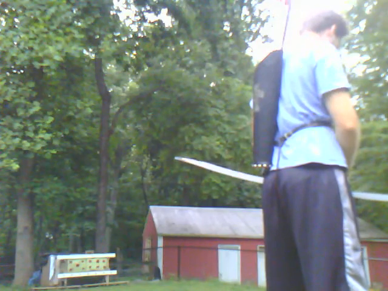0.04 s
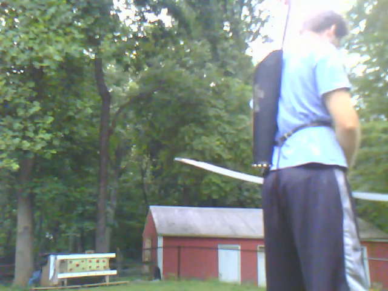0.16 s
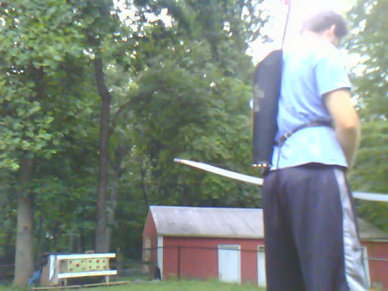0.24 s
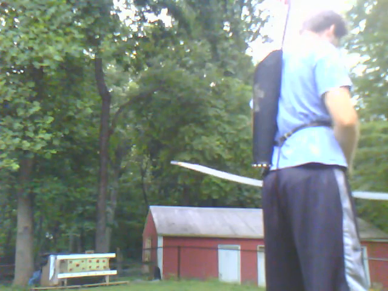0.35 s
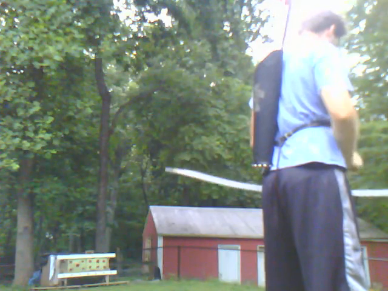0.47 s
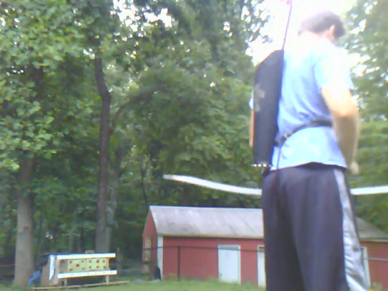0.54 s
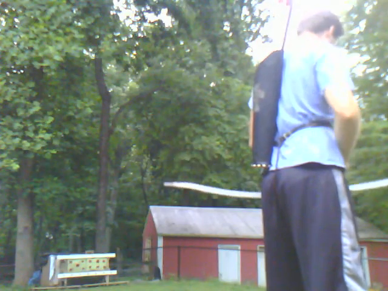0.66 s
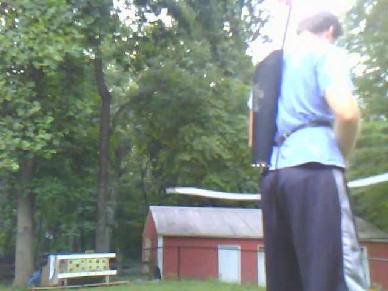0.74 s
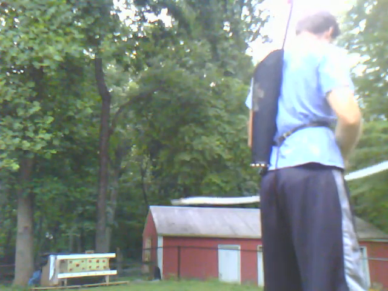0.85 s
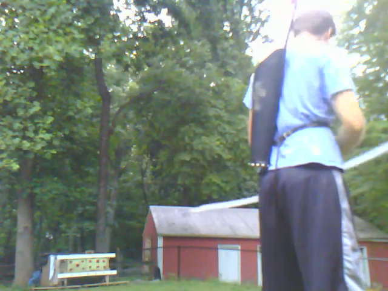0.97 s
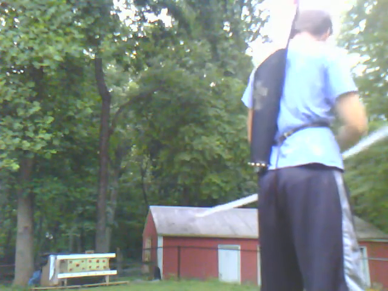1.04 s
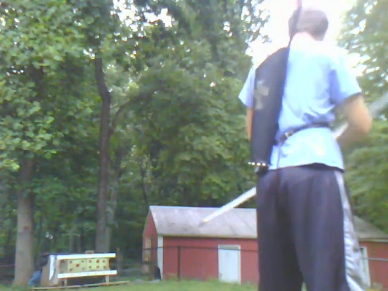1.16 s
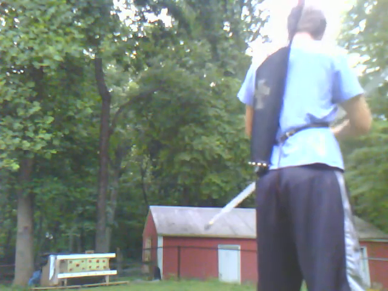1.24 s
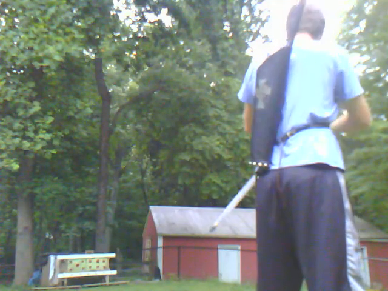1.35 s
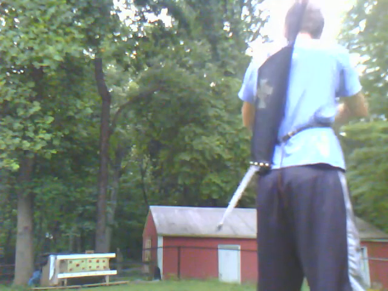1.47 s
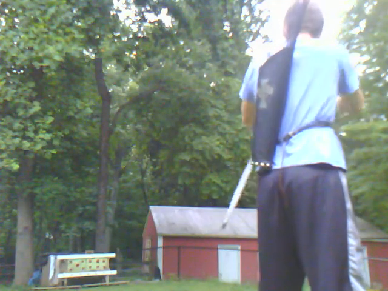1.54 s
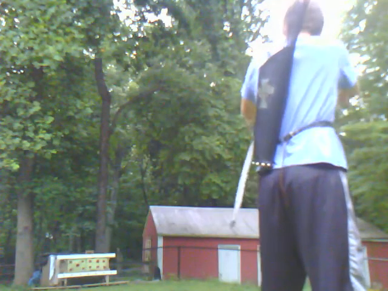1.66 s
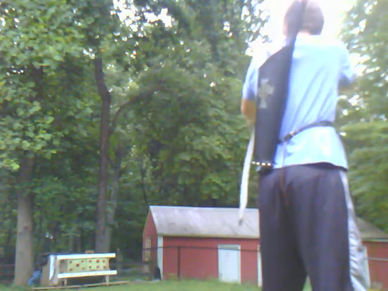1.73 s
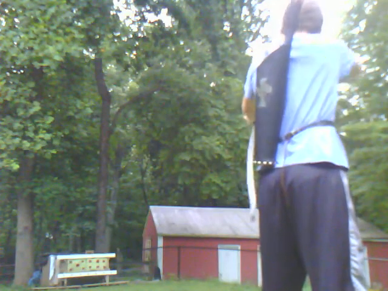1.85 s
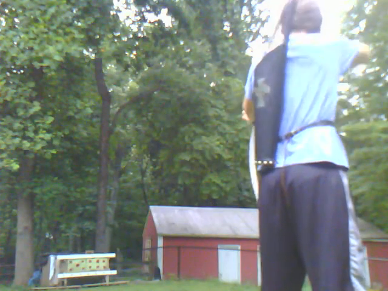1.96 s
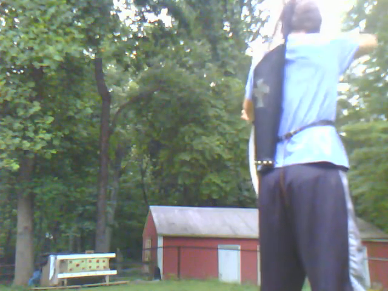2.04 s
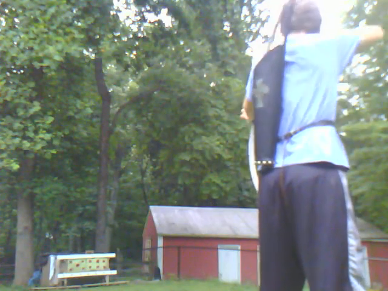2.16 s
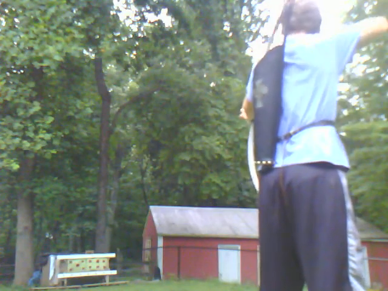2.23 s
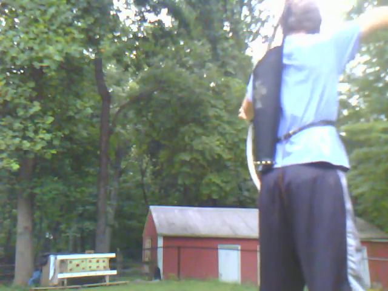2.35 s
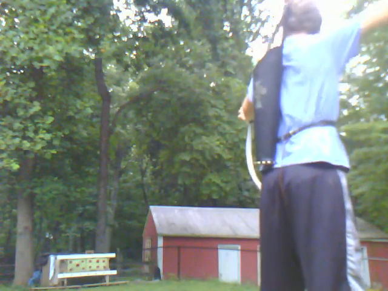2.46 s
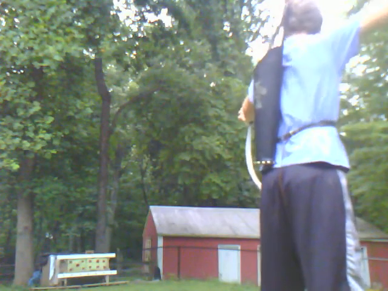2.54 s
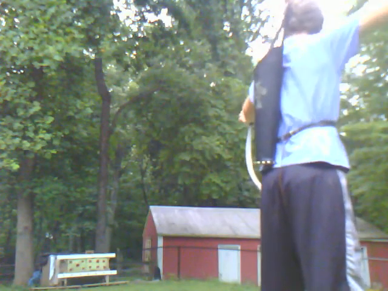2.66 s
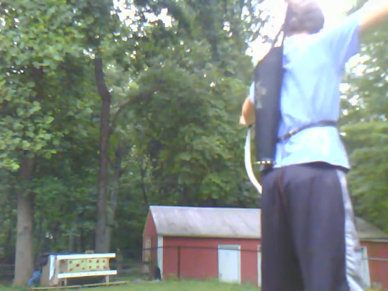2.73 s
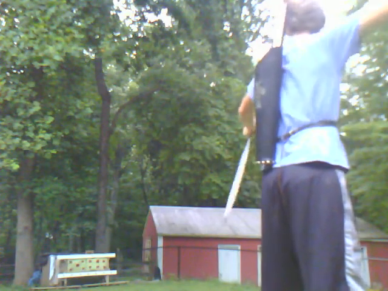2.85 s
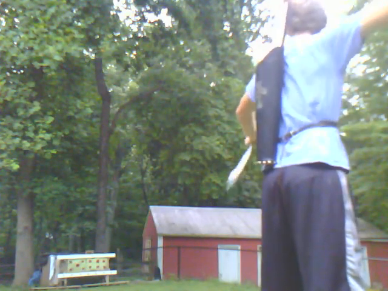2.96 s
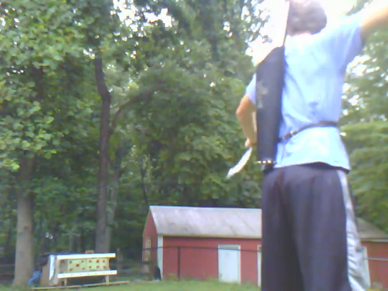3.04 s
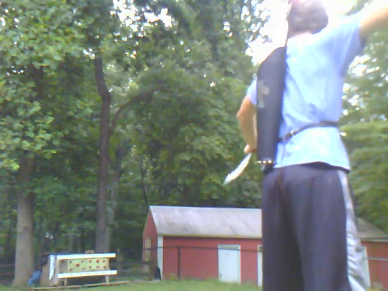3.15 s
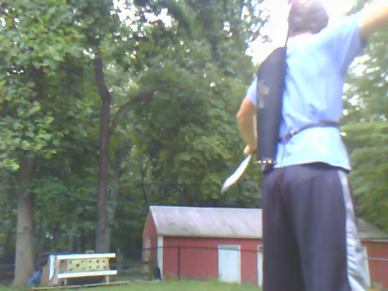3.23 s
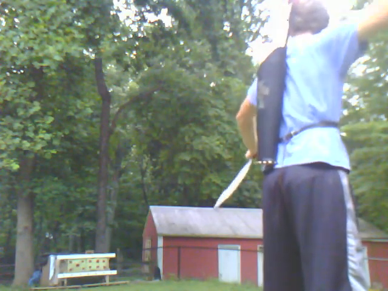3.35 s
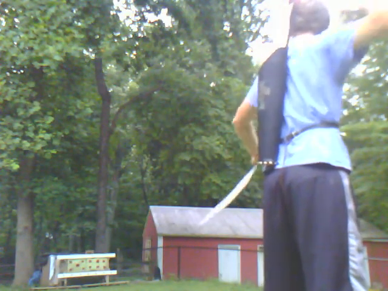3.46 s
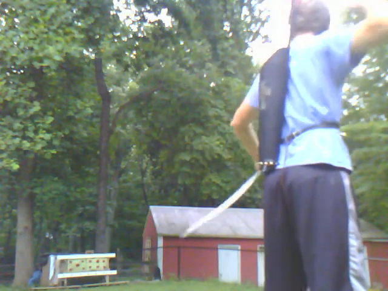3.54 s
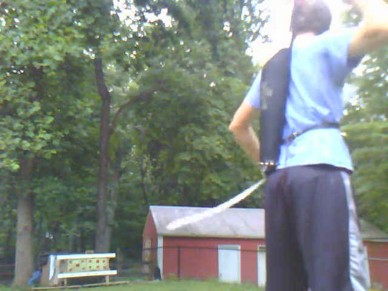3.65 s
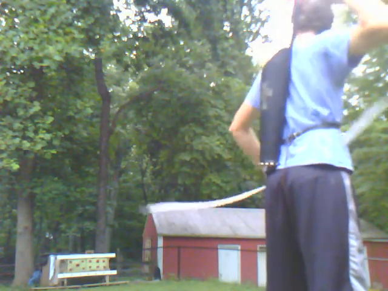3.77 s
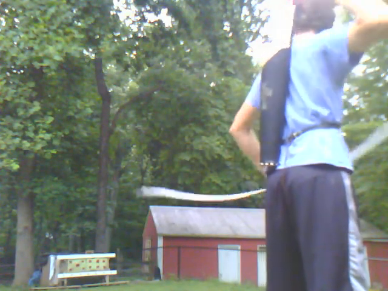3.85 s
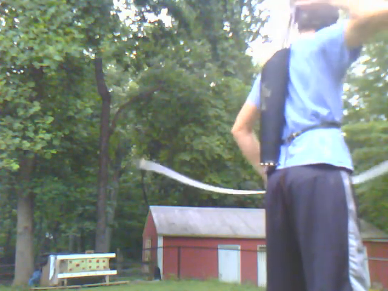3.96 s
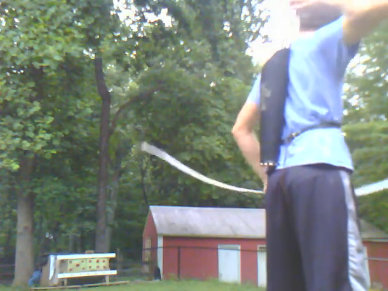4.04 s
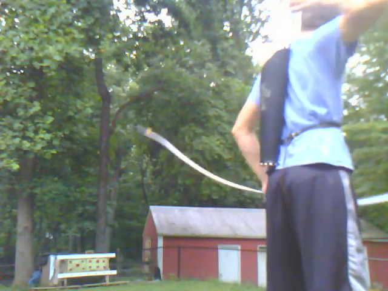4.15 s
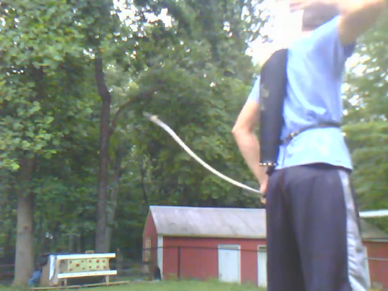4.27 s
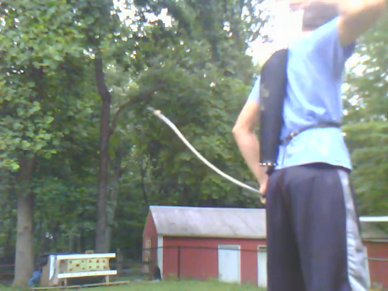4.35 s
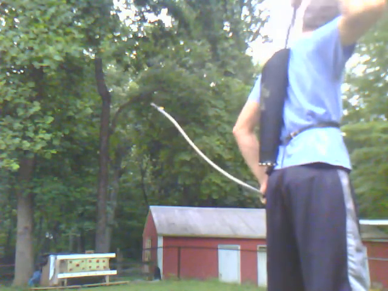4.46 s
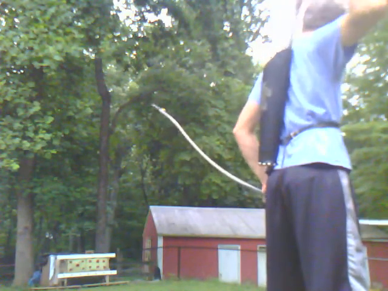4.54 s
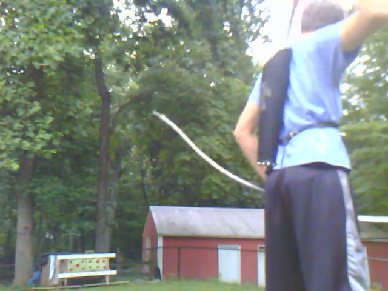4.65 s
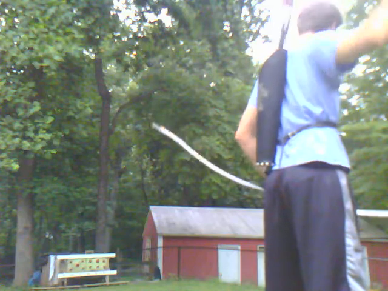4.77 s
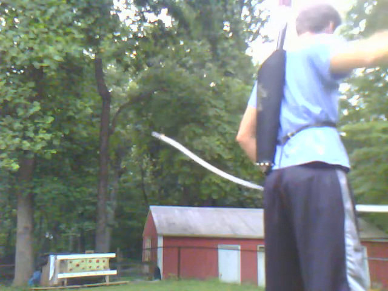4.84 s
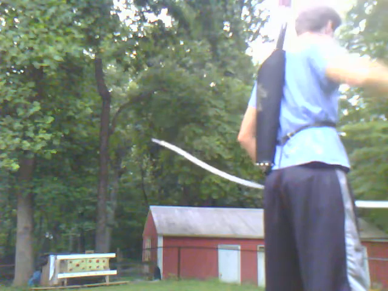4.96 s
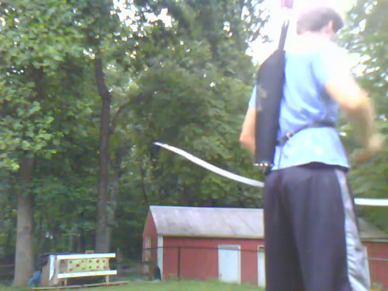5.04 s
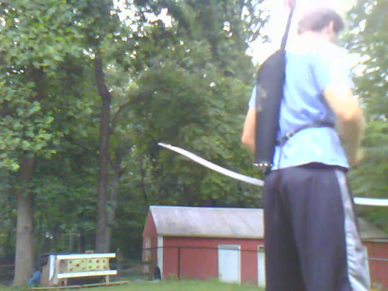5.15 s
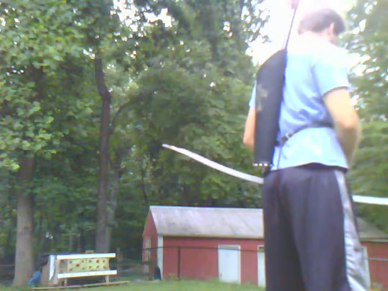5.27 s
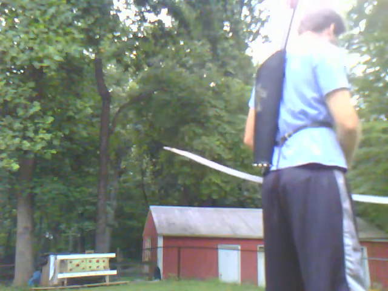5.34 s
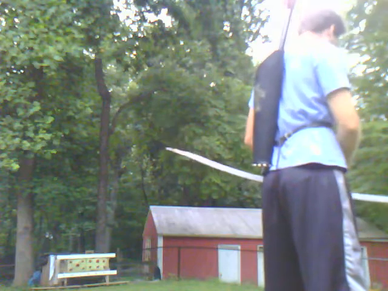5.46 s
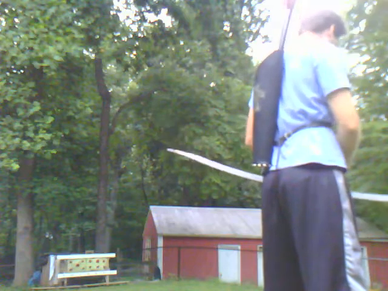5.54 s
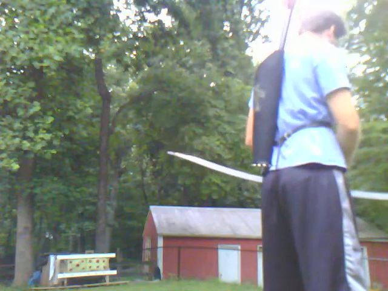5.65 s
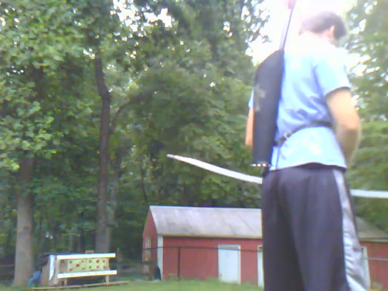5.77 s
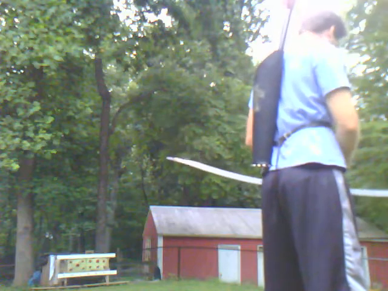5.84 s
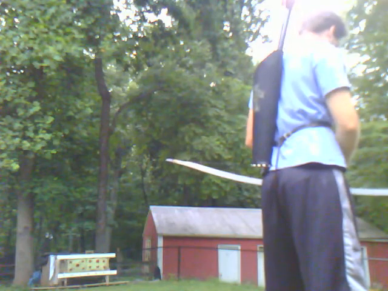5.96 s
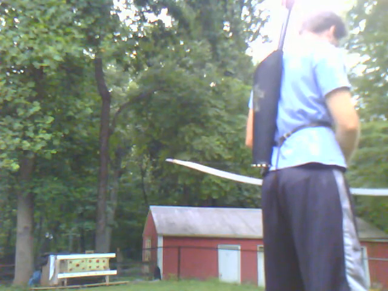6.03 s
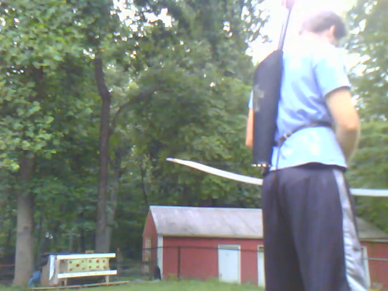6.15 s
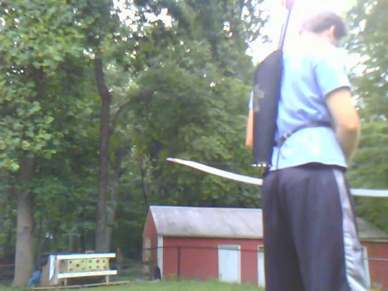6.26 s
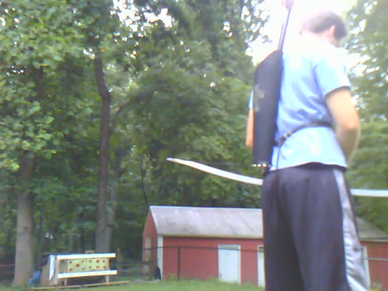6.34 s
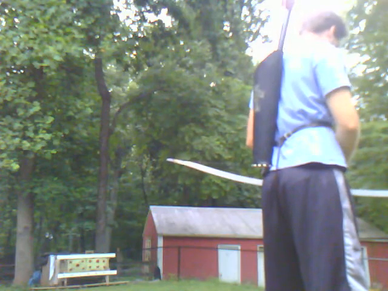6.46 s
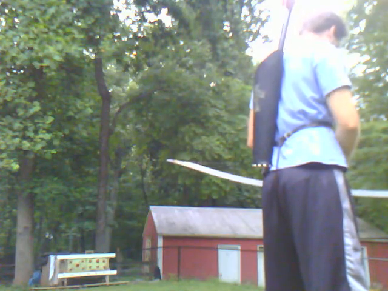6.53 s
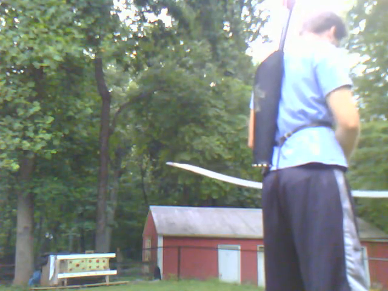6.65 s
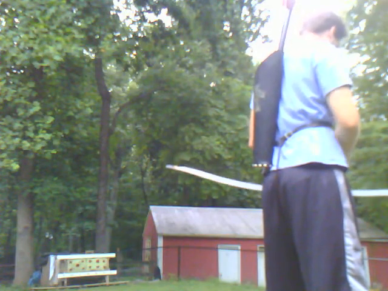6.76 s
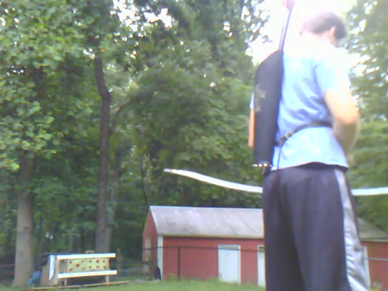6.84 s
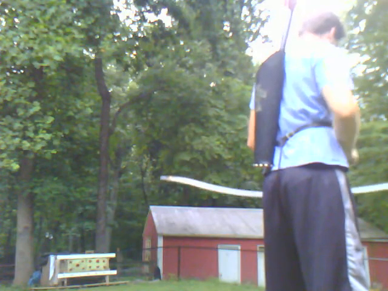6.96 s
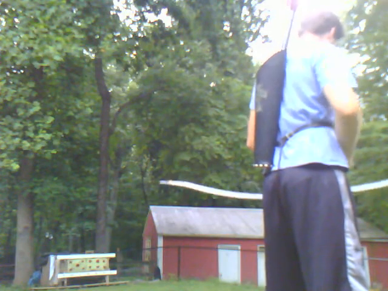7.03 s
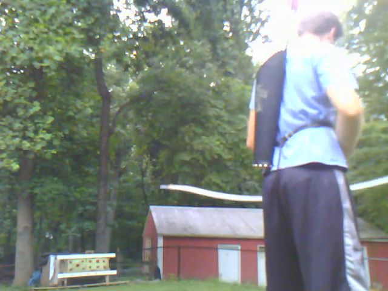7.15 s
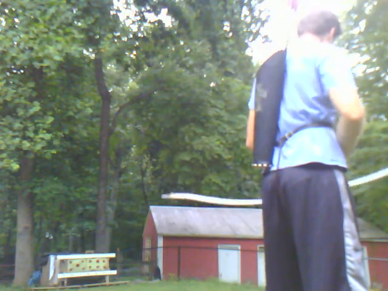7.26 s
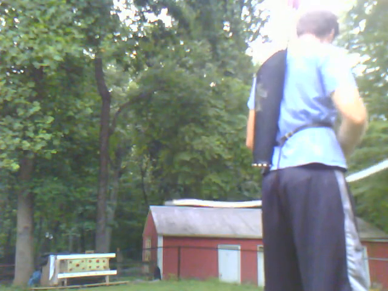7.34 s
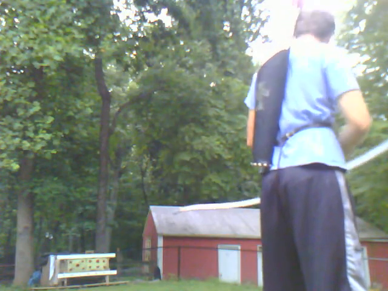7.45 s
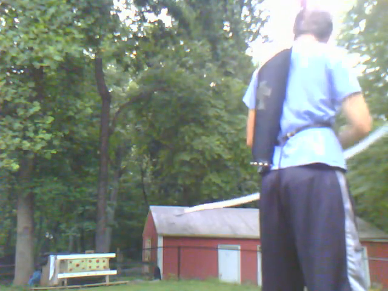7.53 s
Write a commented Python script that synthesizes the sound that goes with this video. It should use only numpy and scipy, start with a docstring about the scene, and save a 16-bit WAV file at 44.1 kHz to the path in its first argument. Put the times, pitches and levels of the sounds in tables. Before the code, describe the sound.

A bow is drawn and shot with a sharp snap, then an arrow rattles out and clicks onto the string as a songbird chirps.

```python
"""Over a low outdoor rumble and a small camera's hiss and whine, a songbird whistles in a wooded backyard.
An archer draws, and the shaft rasps on the rest by stick-slip friction. At the release the string slaps,
the limbs thump, the feathers hiss away and the yard reverberates. The next arrow rubs and rattles out of
the hollow quiver while the bird sings again. Its nock clicks onto the string and sets the shaft ringing;
last come light handling noises and the calls of a second bird, far off."""
import sys
import numpy as np
from scipy import signal
from scipy.fft import rfft, irfft
from scipy.io import wavfile
from scipy.ndimage import uniform_filter1d

SR = 44100
rng = np.random.default_rng(int(sys.argv[2]) if len(sys.argv) > 2 else 0)


def dump_mix(stems):
    """Bounce the given channels to the path in sys.argv[1] as a 16-bit WAV at rate SR."""
    frames = np.atleast_2d(stems).T  # one column per channel
    limited = np.clip(frames, -1, 1)  # hard clip at full scale
    pcm = np.round(limited * 32767).astype(np.int16)
    wavfile.write(sys.argv[1], SR, pcm)


N = 335156
TIME = np.arange(N) / SR

# Levels in the tables are relative: each source applies its own gain and filter.
# spectra of the steady noises: frequency_hz, gain_db
RUMBLE_SPECTRUM = [(15, -6), (45, -3.5), (72, -3.5), (100, -5.5), (135, -8), (170, -13.5), (260, -21),
                   (500, -25.5), (1000, -31), (2000, -41), (5000, -46.5)]
HISS_SPECTRUM = [(300, -7.5), (2000, -0.5), (3300, 1.5), (4200, 3), (4700, 12.5), (5200, 0), (5750, -7.5),
                 (6350, 2), (7000, -10.5), (10000, -14.5), (15500, -25)]
# tones of the camera's whine: pitch_hz, level_db
WHINE_TONES = [(71, -46.5), (1676, -65.5), (6720, -76.5), (8400, -86.5), (11760, -82)]
# reverberation times of the nearest crowns, the woods and the yard: frequency_hz, t60_s
LEAF_DECAY = [(1000, 0.1), (7000, 0.13)]
WOODS_DECAY = [(100, .4), (1500, 0.4), (2400, 1.04), (3600, 1.145), (6000, 1.13), (14000, 0.32)]
YARD_DECAY = [(100, 0.61), (500, 0.84), (2500, 0.78), (7000, 0.9), (14000, 0.35)]

# contours of the near bird's notes, by name: time_s, pitch_hz, level_db
NOTE_CONTOURS = { "slur": [(0, 2660, -21.5), (.008, 3110, -2), (.017, 3160, 2), (.028, 2770, 1.5),
                 (.04, 2250, -8.5), (.052, 2130, -9), (.075, 2230, -8.5), (.09, 2310, -8),
                 (.098, 2300, -32)], "lift": [(0, 2400, -1), (.01, 2525, 4.5), (.02, 2740, 12),
                 (.03, 2830, -3)], "whistle": [(0, 3000, -24), (.008, 3560, -5), (.018, 3655, -1),
                 (.04, 3575, 0), (.078, 3560, -2), (.095, 3420, -4), (.112, 3030, -11), (.12, 2900, -30)],
                 "chip": [(0, 5120, 9), (.007, 6050, -5.5), (.013, 6400, -2.5), (.019, 5670, 3),
                 (.023, 3960, 12.5), (.032, 3200, -1)], "flick": [(0, 4915, -11), (.006, 4580, 0),
                 (.022, 3900, 9), (.03, 3663, -12)], "pip": [(0, 3480, -28.5), (.01, 3430, -11),
                 (.02, 3440, 4.5), (.028, 3250, -16)], "drop": [(0, 2270, -1.5), (.011, 2570, 6),
                 (.022, 2170, 1), (.034, 1700, -5.5), (.05, 1470, -11), (.085, 1400, -14.5),
                 (.1, 1400, -52.5)], "rise": [(0, 3120, -18), (.025, 3250, 0), (.04, 3300, 7),
                 (.085, 3623, 10), (.145, 3767, 3.5), (.215, 3806, 8), (.265, 3838, 1), (.295, 3380, -30)],
                 }
# the two parts of a phrase: offset_s, note, level_db
PHRASE_MOTIF = [(-.181, "slur", -5.5), (-.051, "lift", -14.5), (0, "whistle", -1), (.15, "pip", -11)]
PHRASE_ENDING = [(-.034, "chip", -21.5), (0, "drop", -15.5)]
# phrases, timed from their whistle: start_s, level_db, ending_delay_s, whistle_pitch_hz
SONG_PHRASES = [(-.033, -21.5, .2, 3594), (.5, -21, 0.21, 3545), (4.505, -21, 0.19, 3590),
                (5.024, -20, .198, 3618), (5.565, -20.5, 0.21, 3571)]
# notes outside the phrases: start_s, note, level_db
LONE_NOTES = [(3.815, "rise", -36.5), (4.18, "drop", -40), (4.655, "flick", -30)]
# the far bird's glides: start_s, length_s, first_hz, last_hz, level_db, waver_ratio
FAR_GLIDES = [(2.46, .06, 4060, 3990, -52, .008), (3.605, .045, 3650, 2950, -51, .05),
              (3.69, .13, 2100, 2420, -49.5, .035), (6.73, .08, 4050, 4020, -55.5, .006),
              (6.9, .19, 2750, 2550, -61, .06), (6.91, .2, 3620, 3740, -57, .008),
              (7.12, .37, 3800, 4220, -55, .005), (7.4, .2, 4180, 4180, -61, .008)]

# rubs of sleeve and bow grip, and last a faint low swell: start_s, length_s, level_db
SLEEVE_RUBS = [(2.789, 0.072, -41.5), (2.867, 0.097, -45.5), (7.138, 0.064, -50), (7.296, .35, -64)]
# light knocks of the hands: start_s, level_db, t60_s
HAND_KNOCKS = [(.139, -8.5, 0.055), (1.62, -27.5, 0.044), (6.717, -24, 0.016), (6.797, -24, 0.028),
               (6.921, -23, .03)]
# responses of the cloth, the knocked bow and the plastic nock: frequency_hz, gain_db
CLOTH_SPECTRUM = [(80, 4.5), (180, -6.5), (260, 4), (450, -5), (800, -20), (3000, -24), (9000, -54)]
KNOCK_SPECTRUM = [(100, -4), (400, -8), (700, 2), (1300, -9.5), (2700, 5), (4500, 1.5), (12000, -37)]
NOCK_SPECTRUM = [(200, -22), (700, -13), (1200, -40), (2200, 9.5), (3200, 4), (4000, 10), (5500, -3),
                 (8000, -14), (15000, -31)]
# the nock taps, then snaps onto the string: start_s, level_db
NOCK_CLICKS = [(6.492, -15.5), (6.578, -4.5)]
# modes of the arrow shaft: pitch_hz, level_db, t60_s
SHAFT_MODES = [(1680, -13, 0.12), (2020, -8.5, 0.1), (2215, 1, 0.064), (2589, -13, 0.05), (2780, 2, 0.032),
               (4100, 4, 0.033), (4490, -9, 0.052)]

# short pulls out of the quiver: start_s, length_s, wall_db, feather_db, rattle_db
QUIVER_PULLS = [(3.785, .08, -50.5, -57, -32), (3.958, .13, -52.5, -60, -36),
                (4.094, 0.18, -45.5, -62, -32), (4.35, 0.13, -47.5, -58, -30),
                (4.463, 0.038, -30.5, -43, -10.5), (4.504, 0.14, -34, -37.5, -9),
                (4.648, 0.052, -39.5, -34.5, -11.5), (4.762, 0.075, -50, -39, -16.5),
                (4.852, 0.074, -49.5, -49, -28)]
# the hardest collisions between shafts: start_s, level_db, t60_s
SHAFT_CLACKS = [(3.7768, -16.5, 0.014), (3.8063, -12, 0.033), (3.8272, -13, .012), (3.842, -21, .014),
                (3.9878, -16.5, 0.16), (4.1001, -15.5, 0.037), (4.1585, -16.5, .024),
                (4.3505, -16.5, 0.013), (4.4184, -3, 0.023), (4.4445, -13, .012), (4.4672, -0.5, 0.033),
                (4.4942, -7.5, 0.022), (4.5072, -3.5, .02), (4.5115, -4.5, .026), (4.588, -4, 0.014),
                (4.6, -0.5, 0.037), (4.6224, -7, 0.022), (4.6598, -2, .0082), (4.6655, -4.5, 0.022),
                (4.7666, -6, 0.018), (4.807, -14, 0.022), (4.8988, -21.5, .017), (5.5124, -17.5, 0.024)]
# responses of the hollow quiver, brushed feathers and colliding shafts: frequency_hz, gain_db
QUIVER_SPECTRUM = [(100, -40), (180, -20), (230, 1.5), (290, 5.5), (400, -0.5), (540, -1), (660, -6),
                   (800, -12.5), (1200, -13), (2500, -15), (6000, -47)]
BARB_SPECTRUM = [(1000, -25), (3200, 5), (5500, -4.5), (7300, -31), (10000, -26), (13000, -26),
                 (15500, -52)]
CLACK_SPECTRUM = [(100, -23), (300, -21), (700, -9), (1400, -11.5), (2200, -12), (3200, 8.5), (4200, 1),
                  (5500, -8.5), (7200, -4.5), (8400, -10), (9600, -13.5), (12000, -21), (13500, -33),
                  (15500, -35)]

# the drawn arrow catches on the rest: start_s, level_db, t60_s
DRAW_CATCHES = [(2.731, -14.5, 0.024), (2.7455, -7.5, 0.025), (2.7665, -5, 0.035), (2.7775, -8, 0.022),
                (2.793, -6, 0.04), (2.826, -13.5, 0.074), (2.942, -20, 0.012)]
# it rasps between the catches: start_s, length_s, level_db
DRAW_RASPS = [(2.75, 0.078, -43)]
# the wood squeaks under it: time_s, pitch_hz, level_db
SQUEAK_CONTOUR = [(2.752, 1350, -48), (2.755, 1800, -41), (2.758, 2080, -34), (2.765, 2070, -35.5),
                  (2.769, 2490, -32)]
# response of the shaft on the rest: frequency_hz, gain_db
SCRAPE_SPECTRUM = [(60, -7), (200, 0), (420, 12), (700, 1.5), (1200, 1), (1900, -1), (2600, 0), (3900, 3.5),
                   (5500, -12), (9000, -21), (15000, -45)]

# low blows of limbs, arm and quiver: start_s, level_db, pitch_hz, length_s
AIR_PULSES = [(2.763, -22, 129, 0.0085), (2.771, -33, 77.4, 0.0487), (3.036, -20, 184, 0.0064),
              (3.077, -38, 45, 0.086), (3.48, -37, 55, 0.04), (4.466, -13.5, 347, 0.0051)]
# the string slaps home and the arrow clatters past the bow: start_s, level_db, t60_s
STRING_SLAPS = [(3.0354, -12, 0.0049), (3.0366, -1, 0.0074), (3.0380, -2.5, 0.0053), (3.0396, -.5, 0.0093),
                (3.0417, -11, .012), (3.0548, -13.5, .008)]
# spectra of the slap and of the feathers in flight: frequency_hz, gain_db
SLAP_SPECTRUM = [(40, -32), (170, 11), (270, 1.5), (390, 10), (560, -4.5), (780, -1.5), (1000, -4),
                 (1350, -10), (2000, -4), (2800, -0.5), (3700, 2), (4500, -19), (7500, -17), (10000, -28),
                 (15000, -48)]
FLIGHT_SPECTRUM = [(200, -17), (800, -3), (1300, -7), (3400, 2), (5500, -3), (8000, -6.5), (11500, -13.5),
                   (15000, -26)]
# modes of bow and arrow: pitch_hz, level_db, t60_s
BOW_MODES = [(220, -0.5, .12), (363, -2, 0.071), (484, -10, .07), (750, -12, 0.053), (1076, -2.5, 0.029),
             (2520, -9, 0.02), (2890, -2.5, 0.055), (3410, -9, 0.068), (4000, -5.5, 0.1), (8150, -19, .16)]

LOOSE_S = 3.036  # the arrow leaves the string
SWING_PERIOD_S, SWING_LOSS_DB = .0585, 8.5  # free oscillation of the limbs


def amp(db):
    """Amplitude ratio of a level in decibels."""
    return 10 ** (np.asarray(db) / 20)


def unit_rms(x):
    """Normalisation to a mean power of one."""
    return x / np.sqrt(np.mean(x ** 2) + 1e-20)


def curve_at(points, hz):
    """Interpolation on a logarithmic frequency axis."""
    frequency, value = np.transpose(points)
    return np.interp(np.log(hz + 1), np.log(frequency + 1), value)


def drift(count, cutoff_hz):
    """Random modulation: low-passed noise of about unit rms."""
    hz = np.fft.rfftfreq(count + SR, 1 / SR)
    spectrum = rfft(rng.standard_normal(count + SR))
    return unit_rms(irfft(spectrum / (1 + (hz / cutoff_hz) ** 4)))[:count]


def colour(x, spectrum, size=4096):
    """Source-filter principle: the excitation passes a minimum-phase response of unit energy."""
    log_gain = np.log(amp(curve_at(spectrum, abs(np.fft.fftfreq(size, 1 / SR)))))
    taps = np.fft.ifft(np.exp(signal.hilbert(log_gain).conj())).real[:size // 2]
    return signal.oaconvolve(x, taps / np.linalg.norm(taps))[:N]


def echoes(x, decay, delay_s, build_s):
    """Reverberation by scattering: sparse reflections build up, then each band decays at its own rate."""
    t = TIME[:SR * 2]
    reflections = rng.standard_normal(len(t)) * (rng.random(len(t)) < .06)
    hz, frame_s, bands = signal.stft(reflections, SR, nperseg=256)
    bands = bands * amp(-60 * frame_s / curve_at(decay, hz)[:, None])
    tail = signal.istft(bands, SR)[1][:len(t)]
    tail *= 1 - np.exp(-np.maximum(t - delay_s, 0) / build_s)
    return signal.fftconvolve(x, tail / np.linalg.norm(tail))[:len(x)]


def impacts(hits, spectrum, chatter):
    """Impact excitation: an impulse and a decaying chatter, filtered by the struck body."""
    force, t = np.zeros(N), TIME[:SR // 10]
    for start_s, db, t60_s in hits:
        dying_noise = unit_rms(rng.standard_normal(len(t)) * amp(-60 * t / t60_s))
        push = chatter * dying_noise / np.sqrt(len(t))
        push[0] += 1
        add(force, start_s, amp(db) * push / np.linalg.norm(push))
    return colour(force, spectrum)


def ringing(hits, modes):
    """Modal vibration: every hit excites the same damped sinusoids."""
    out, t = np.zeros(N), TIME[:SR // 4]
    ring = sum(amp(db - 60 * t / t60_s) * np.sin(2 * np.pi * hz * t) for hz, db, t60_s in modes)
    for start_s, db, *_ in hits:
        add(out, start_s, amp(db) * ring)
    return out


def add(mix, start_s, sound):
    """Superposition: a sound joins the mix at its starting time."""
    start = round(start_s * SR)
    sound = sound[max(-start, 0):]
    part = mix[max(start, 0):][:len(sound)]
    part += sound[:len(part)]


def stroke(start_s, length_s, attack_s, release_s):
    """Amplitude envelope of one hand movement, with linear rise and fall."""
    return np.clip(np.minimum((TIME - start_s) / attack_s, (start_s + length_s - TIME) / release_s), 0, 1)


def friction(slips_per_s, grip_db):
    """Stick-slip friction of unit rms: tiny random slips under a wavering grip."""
    grip = amp(grip_db * drift(N, 60))
    return unit_rms(grip * rng.standard_normal(N) * (rng.random(N) < slips_per_s / SR))


def glide(contour, waver=.002):
    """Frequency and amplitude modulation: a nearly pure tone follows a contour."""
    time_s, hz, db = np.transpose(contour)
    t = np.arange(time_s[0], time_s[-1], 1 / SR)
    pitch_hz = uniform_filter1d(np.interp(t, time_s, hz), size=300) * (1 + waver * drift(len(t), 78))
    tone = np.sin(2 * np.pi * np.cumsum(pitch_hz) / SR)
    return amp(np.interp(t, time_s, db)) * tone * signal.windows.tukey(len(t), .06)


def background():
    """Noise floor: amplitude-modulated outdoor rumble, with the camera's even hiss and wavering tones."""
    rumble = amp(-45.5) * colour(rng.standard_normal(N) * amp(.58 * drift(N, 10)), RUMBLE_SPECTRUM)
    hiss = amp(-54) * colour(rng.standard_normal(N), HISS_SPECTRUM)
    whine = sum(amp(db) * np.sin(2 * np.pi * np.cumsum(hz + 4 * drift(N, 9.7)) / SR)
                for hz, db in WHINE_TONES)
    return rumble + hiss + whine


def song(reference_hz=3590):
    """Repetition of one phrase, its whistle transposed; rows of start_s, note, level_db, pitch_ratio."""
    notes = [(start_s, note, db, 1) for start_s, note, db in LONE_NOTES]
    for start_s, phrase_db, ending_delay_s, whistle_hz in SONG_PHRASES:
        for offset_s, note, db in PHRASE_MOTIF:
            ratio = whistle_hz / reference_hz if note == "whistle" else 1
            notes.append((start_s + offset_s, note, phrase_db + db, ratio))
        for offset_s, note, db in PHRASE_ENDING:
            notes.append((start_s + ending_delay_s + offset_s, note, phrase_db + db, 1))
    return notes


def birds(lead_s=.3):
    """Multipath propagation: two birds are heard directly and by scattering from leaves and trunks."""
    lead = round(lead_s * SR)  # the song is under way when the scene begins
    near, chips, far = np.zeros((3, lead + N))
    for start_s, note, db, ratio in song():
        detuned = ratio + .003 * rng.standard_normal()
        tone = glide(np.multiply(NOTE_CONTOURS[note], [1, detuned, 1]))
        add(chips if note in ("chip", "flick") else near, lead_s + start_s, amp(db) * tone)
    near *= amp(1.5 * drift(len(near), cutoff_hz=70))  # the level trembles
    for start_s, length_s, first_hz, last_hz, db, waver in FAR_GLIDES:
        call = glide([(0, first_hz, db), (length_s, last_hz, db)], waver)
        add(far, lead_s + start_s, call * signal.windows.tukey(len(call), .6))
    direct = amp(-2) * near + amp(1) * far + amp(-8) * chips
    leaves = echoes(amp(-10.5) * (near + chips) + amp(-2) * far, LEAF_DECAY, delay_s=.0014, build_s=.002)
    woods = echoes(amp(-9) * (near + chips) + amp(-4) * far, WOODS_DECAY, delay_s=.015, build_s=.016)
    return (direct + leaves + woods)[lead:]


def handling():
    """Friction and light impact: the hands rub dully and knock on the bow."""
    pressure = sum(amp(db) * stroke(start_s, length_s, attack_s=.018, release_s=.042)
                   for start_s, length_s, db in SLEEVE_RUBS)
    rub = colour(pressure * rng.standard_normal(N), CLOTH_SPECTRUM)
    return rub + amp(-4.5) * impacts(HAND_KNOCKS, KNOCK_SPECTRUM, chatter=5)


def nock():
    """Impulse response: the click of the plastic nock excites the modes of the shaft."""
    hits = [(start_s, db, .016) for start_s, db in NOCK_CLICKS]
    click = impacts(hits, NOCK_SPECTRUM, chatter=4)
    return amp(-29) * ringing(hits, SHAFT_MODES) + amp(-3.5) * click


def quiver(rattles_per_s=55, rattle_spread_db=3, rattle_t60_s=.017):
    """Friction and collision: each pull rubs the hollow wall, brushes feathers and rattles the shafts."""
    wall, feathers = np.zeros((2, N))
    rattles = []
    for start_s, length_s, wall_db, feather_db, rattle_db in QUIVER_PULLS:
        pull = stroke(start_s, length_s, attack_s=.0051, release_s=.018)
        wall += amp(wall_db) * pull
        feathers += amp(feather_db) * pull
        for k, (jitter, hardness) in enumerate(rng.uniform(-1, 1, size=(40, 2))):
            after_s = (k + .5 + jitter / 2) / rattles_per_s
            if after_s < length_s:
                rattles.append((start_s + after_s, rattle_db + rattle_spread_db * hardness, rattle_t60_s))
    slips = friction(slips_per_s=3500, grip_db=4)
    clacks = amp(1) * impacts(SHAFT_CLACKS + rattles, CLACK_SPECTRUM, chatter=1.6)
    return colour(wall * slips, QUIVER_SPECTRUM) + colour(feathers * slips, BARB_SPECTRUM) + clacks


def draw():
    """Stick-slip motion: the shaft rasps, catches and squeaks as it slides over the rest."""
    pressure = sum(amp(db) * stroke(start_s, length_s, attack_s=.02, release_s=.06)
                   for start_s, length_s, db in DRAW_RASPS)
    out = colour(pressure * friction(slips_per_s=920, grip_db=5), SCRAPE_SPECTRUM)
    out += amp(-3) * impacts(DRAW_CATCHES, SCRAPE_SPECTRUM, chatter=4)
    squeak = glide(SQUEAK_CONTOUR, waver=.072)
    roughness = drift(len(squeak), cutoff_hz=610)
    add(out, SQUEAK_CONTOUR[0][0], amp(2.5) * squeak * roughness)
    return out


def swings(count=3):
    """Damped oscillation: the limbs lose equal decibels each swing; rows of start_s, level_db."""
    return [(LOOSE_S + k * SWING_PERIOD_S, -k * SWING_LOSS_DB) for k in range(count)]


def thumps(puff_lag_s=.016, puff_db=-20, puff_hz=74.4, puff_length_s=.0212):
    """Radiation by displaced air: each low blow and each swing of the limbs sends out a short pulse."""
    out = np.zeros(N)
    puffs = [(start_s + puff_lag_s, puff_db + db, puff_hz, puff_length_s) for start_s, db in swings()]
    for start_s, db, hz, length_s in AIR_PULSES + puffs:
        t = np.arange(0, length_s, 1 / SR)
        envelope = amp(db) * np.sin(np.pi * t / length_s)
        add(out, start_s, envelope * np.sin(2 * np.pi * hz * (length_s / 2 - t)))
    return out


def flight(level_db=-33, rise_s=.008, fade_db_per_s=130):
    """A receding source: the hiss of the feathers swells, then fades as the arrow flies off."""
    flown_s = np.maximum(TIME - LOOSE_S, 0)
    envelope = np.minimum(flown_s / rise_s, 1) * amp(level_db - fade_db_per_s * flown_s)
    hiss = rng.standard_normal(N) * amp(1.1 * drift(N, 150))
    return colour(envelope * hiss, FLIGHT_SPECTRUM)


def shot(rebound_t60_s=.06):
    """Impact and free vibration: the string slaps home, rattles at each return and sets the bow ringing."""
    rebounds = [(start_s + SWING_PERIOD_S, db - 18, rebound_t60_s) for start_s, db in swings()]
    slap = impacts(STRING_SLAPS, SLAP_SPECTRUM, chatter=.6)
    rattle = impacts(rebounds, SLAP_SPECTRUM, chatter=2.5)
    return amp(6) * (slap + rattle) + amp(-26) * ringing(STRING_SLAPS + rebounds, BOW_MODES)


def scene():
    """Superposition of the archer's direct sound, the yard's reverberation, birds and background."""
    bow = draw() + shot() + flight() + thumps()
    hands = quiver() + nock() + handling()
    yard = echoes(amp(-17) * bow + amp(-19) * hands, YARD_DECAY, delay_s=.0078, build_s=.02)
    # a gentle low-pass softens the top treble of the bow, hands and yard
    soft_top = signal.butter(3, 14200, fs=SR, output="sos")
    archer = signal.sosfilt(soft_top, bow + hands + yard)
    return (archer + birds() + background())[None]


def record(dry):
    """Saturation and band limiting: the small microphone rounds the peaks, then a low-pass follows."""
    ceiling, edge_hz = .6, 15800
    rounded = ceiling * np.tanh(dry / ceiling)
    low_pass = signal.firwin(1535, edge_hz, window=("kaiser", 9), fs=SR)
    return signal.oaconvolve(rounded, low_pass[None], "same")


dry = scene()
out = record(dry)
dump_mix(out)
```